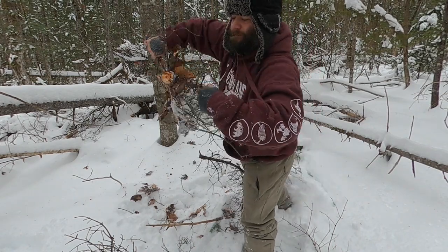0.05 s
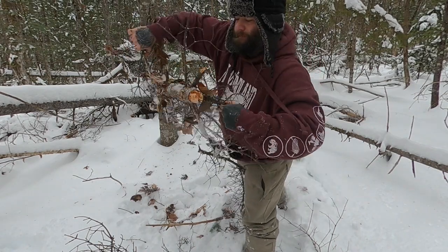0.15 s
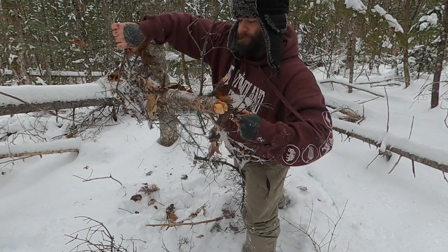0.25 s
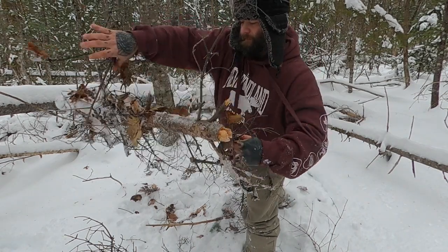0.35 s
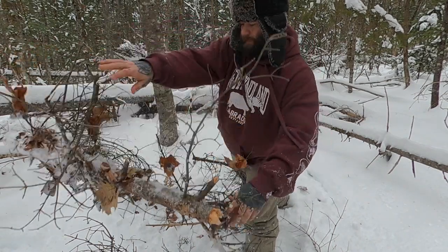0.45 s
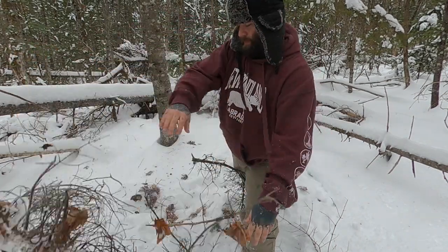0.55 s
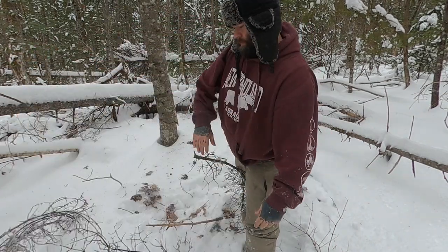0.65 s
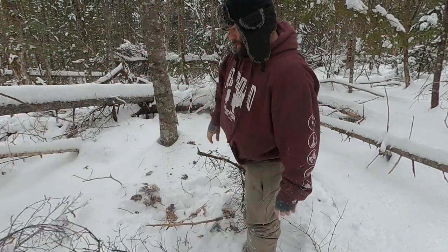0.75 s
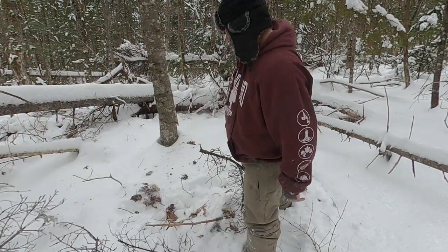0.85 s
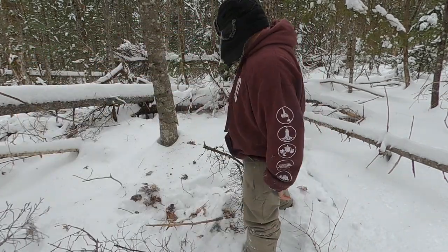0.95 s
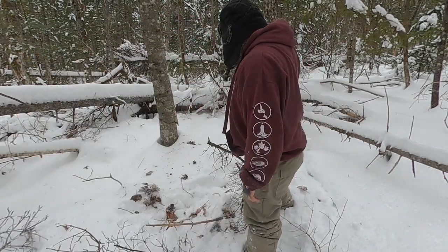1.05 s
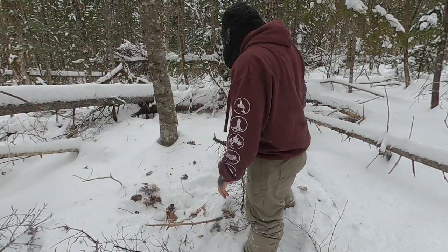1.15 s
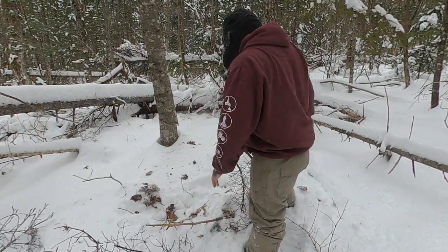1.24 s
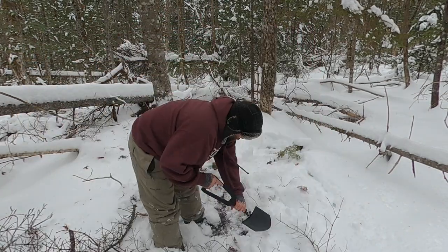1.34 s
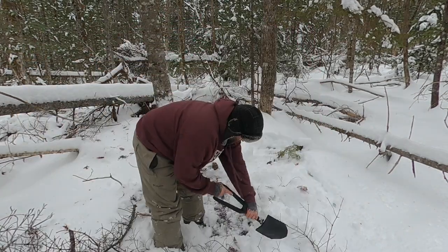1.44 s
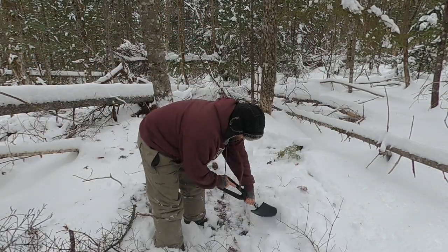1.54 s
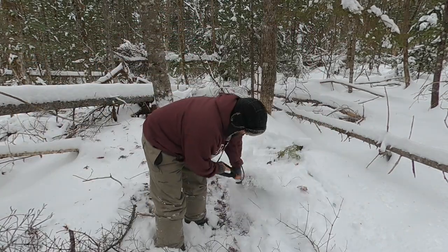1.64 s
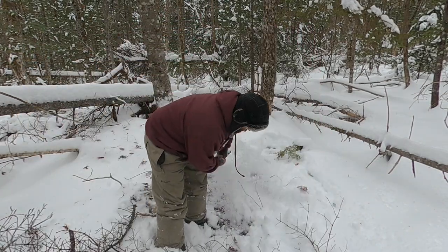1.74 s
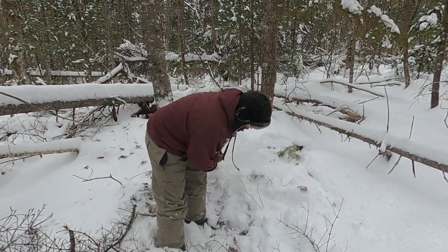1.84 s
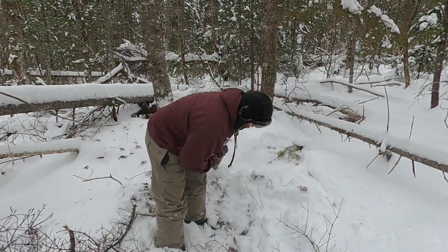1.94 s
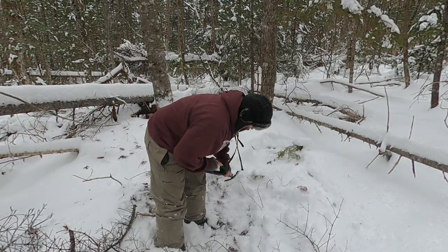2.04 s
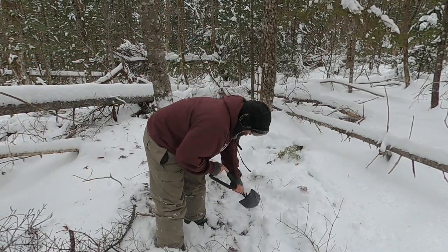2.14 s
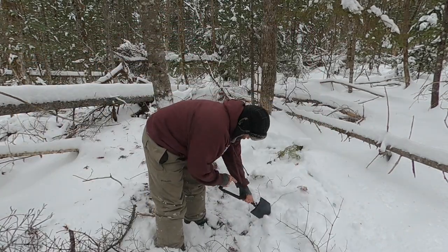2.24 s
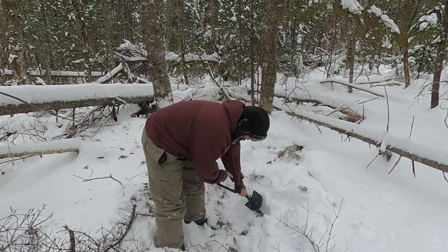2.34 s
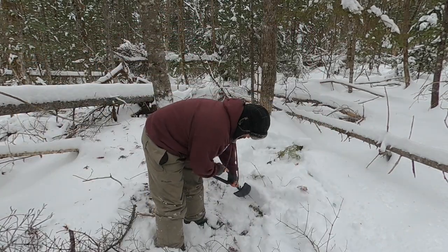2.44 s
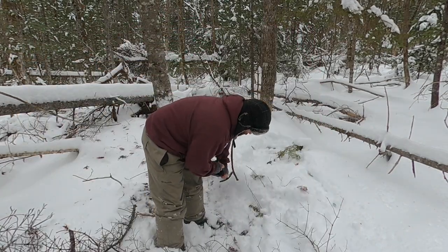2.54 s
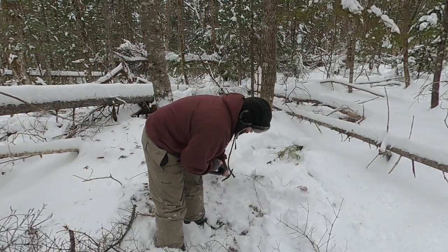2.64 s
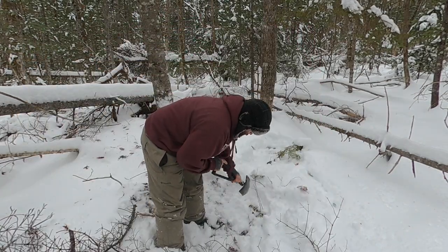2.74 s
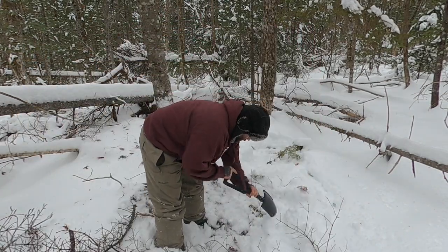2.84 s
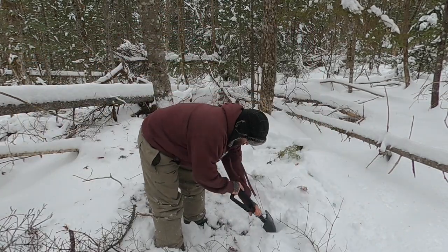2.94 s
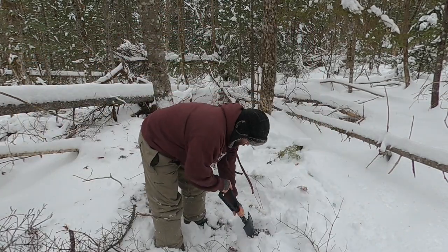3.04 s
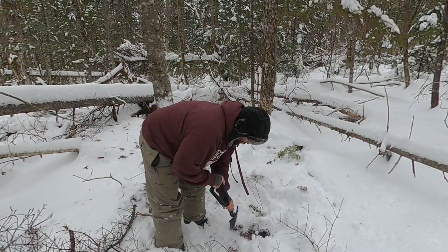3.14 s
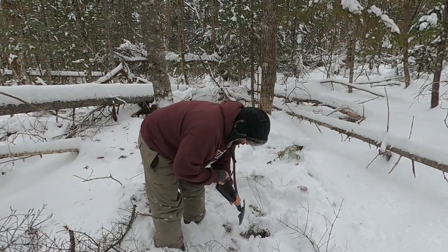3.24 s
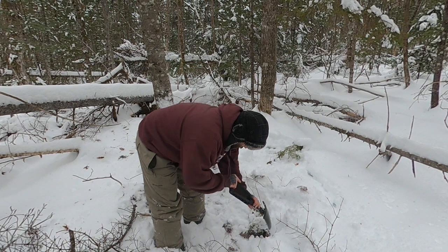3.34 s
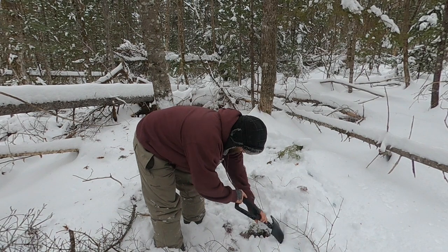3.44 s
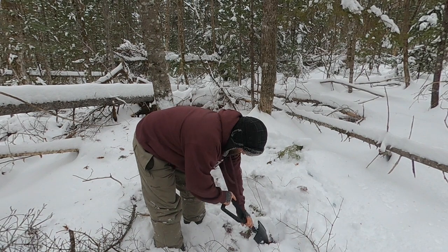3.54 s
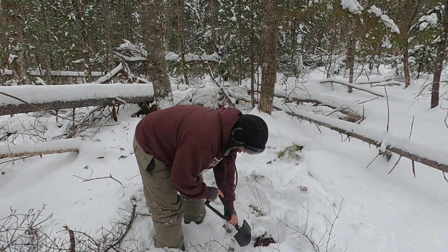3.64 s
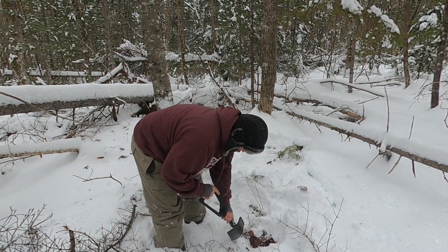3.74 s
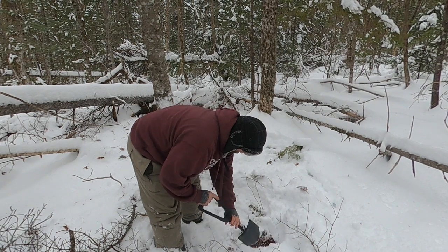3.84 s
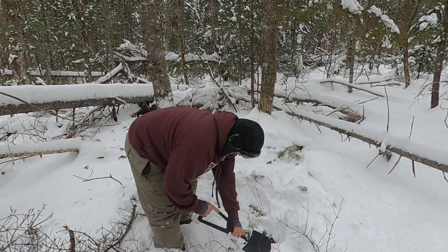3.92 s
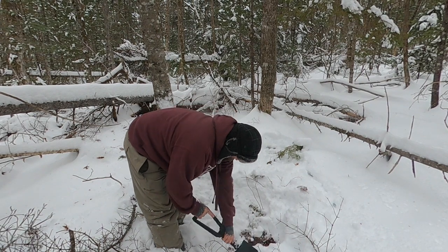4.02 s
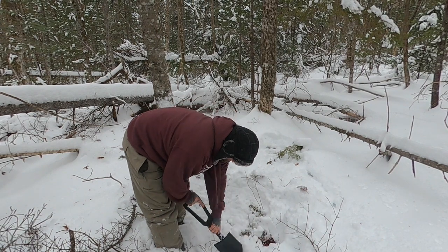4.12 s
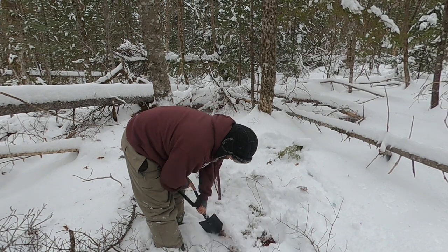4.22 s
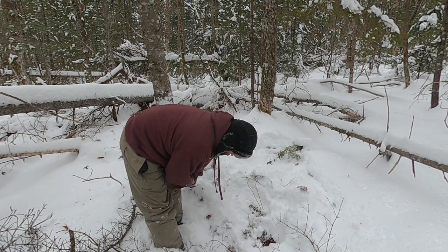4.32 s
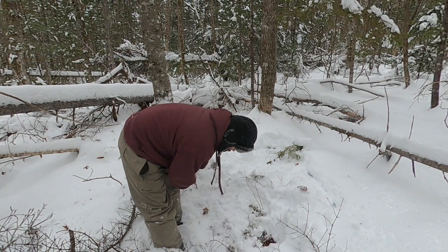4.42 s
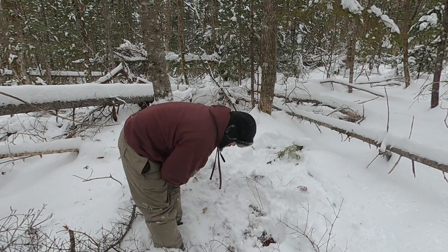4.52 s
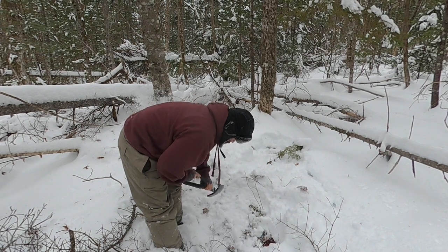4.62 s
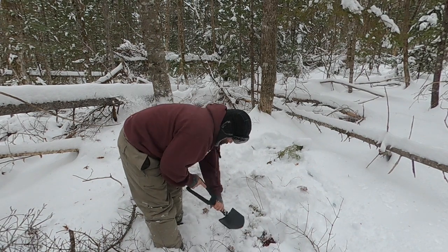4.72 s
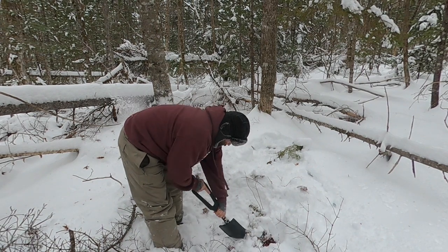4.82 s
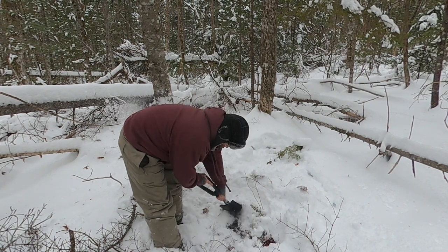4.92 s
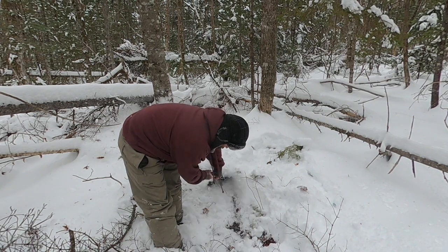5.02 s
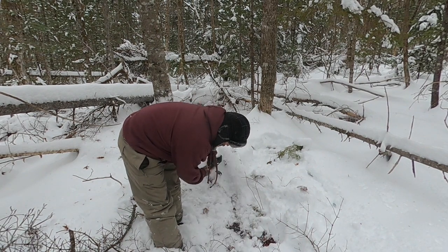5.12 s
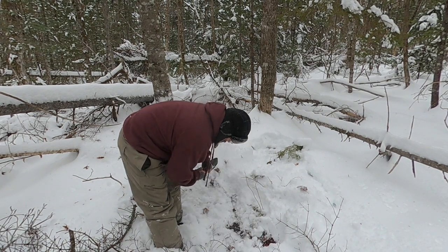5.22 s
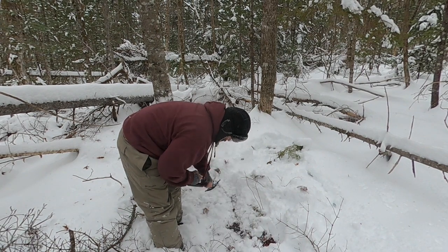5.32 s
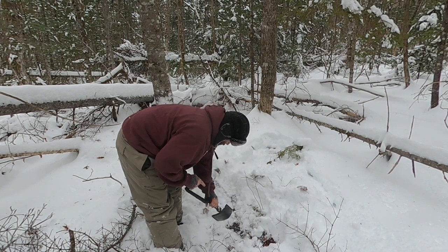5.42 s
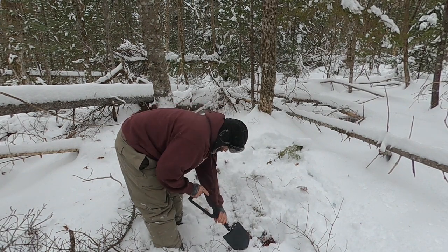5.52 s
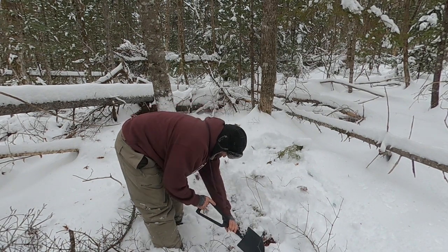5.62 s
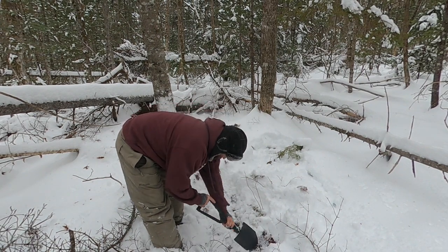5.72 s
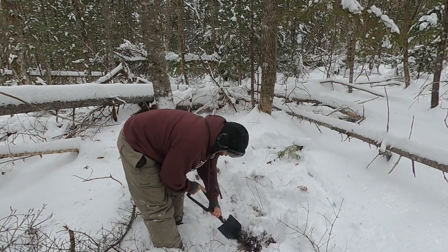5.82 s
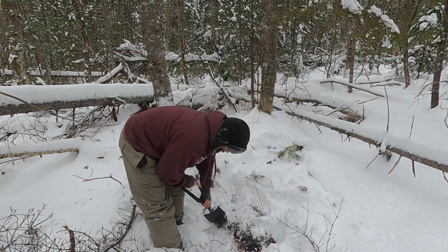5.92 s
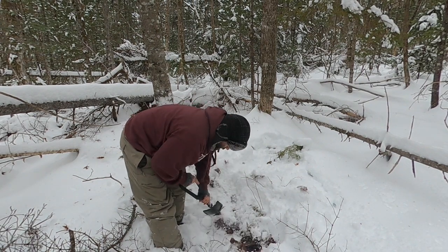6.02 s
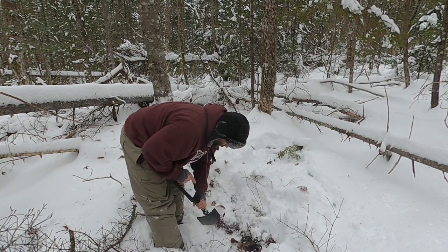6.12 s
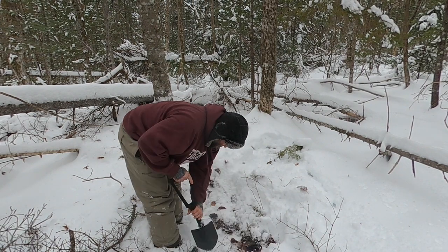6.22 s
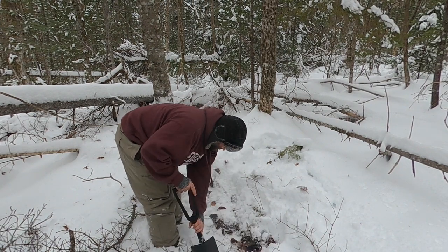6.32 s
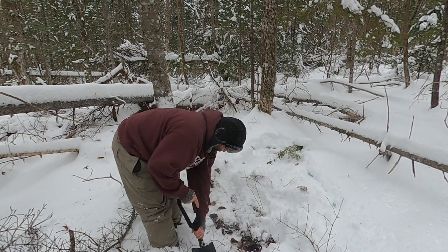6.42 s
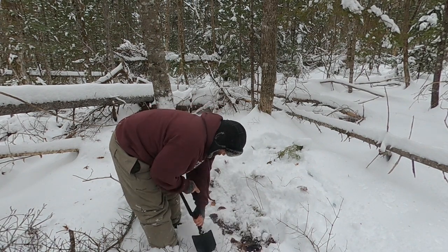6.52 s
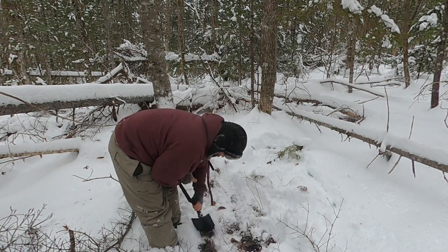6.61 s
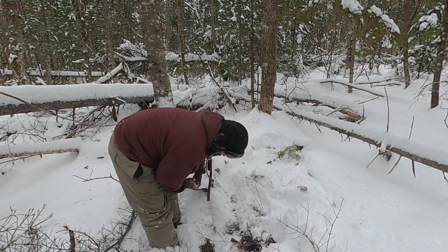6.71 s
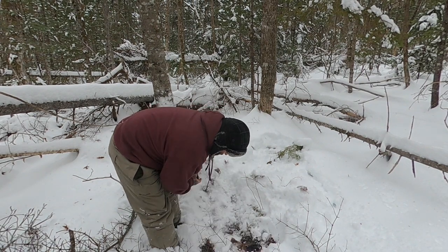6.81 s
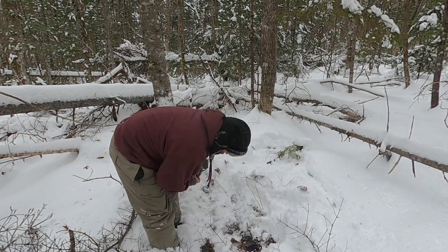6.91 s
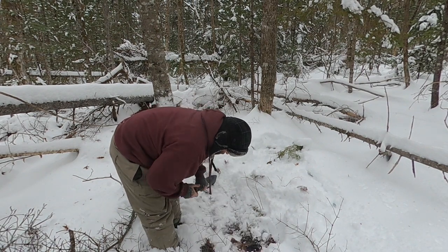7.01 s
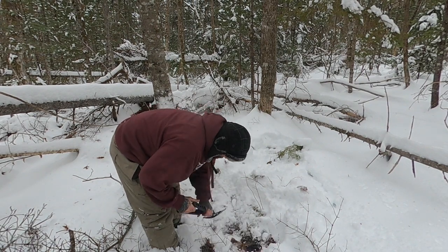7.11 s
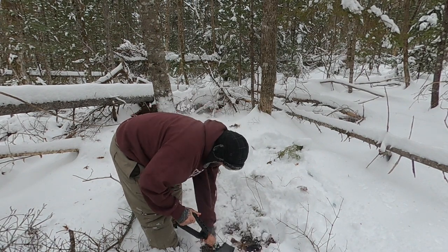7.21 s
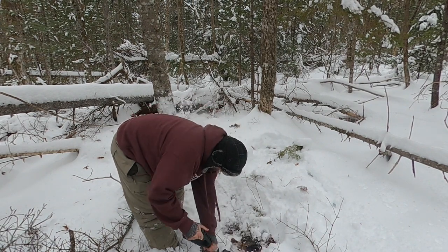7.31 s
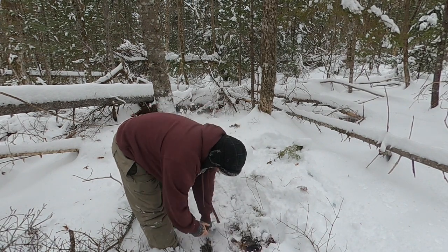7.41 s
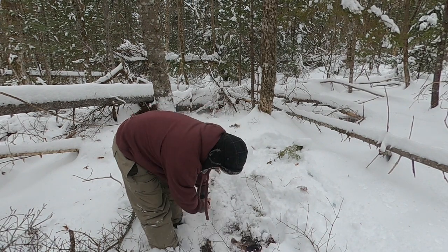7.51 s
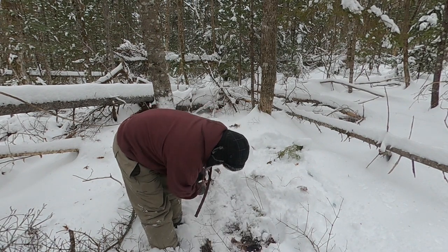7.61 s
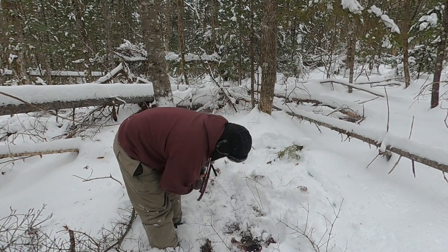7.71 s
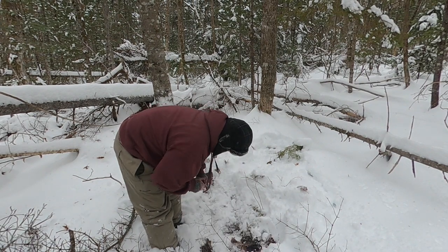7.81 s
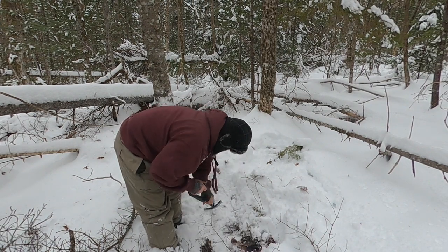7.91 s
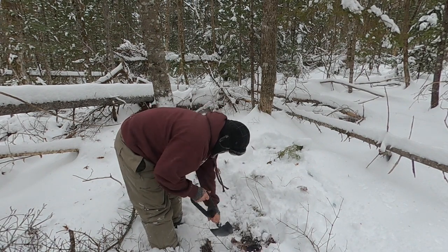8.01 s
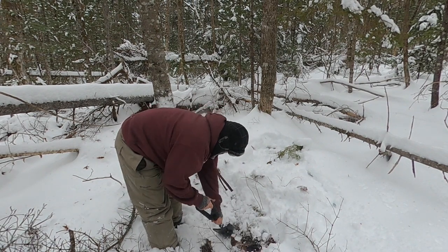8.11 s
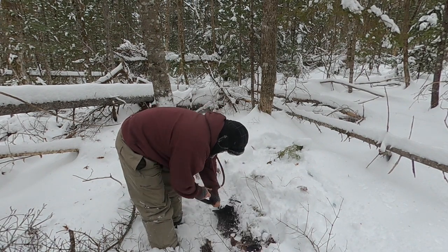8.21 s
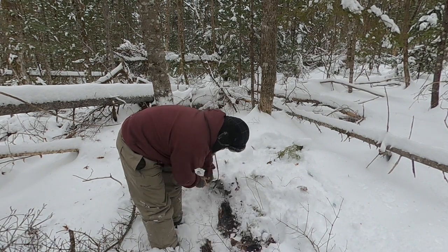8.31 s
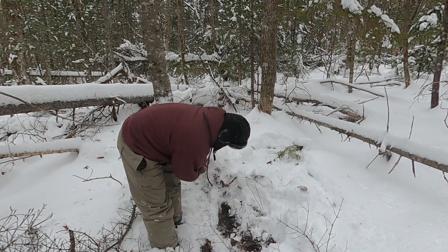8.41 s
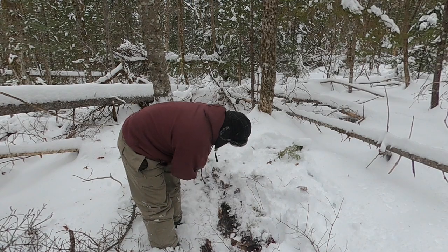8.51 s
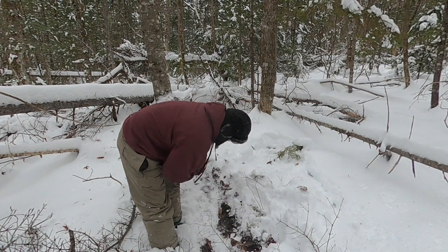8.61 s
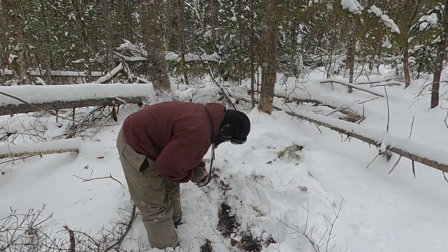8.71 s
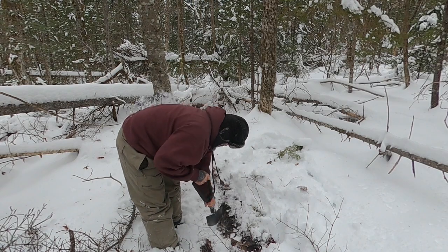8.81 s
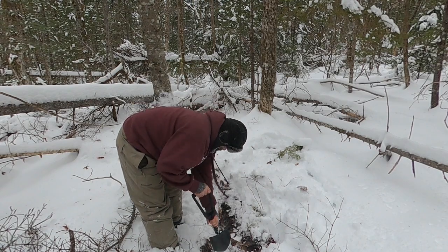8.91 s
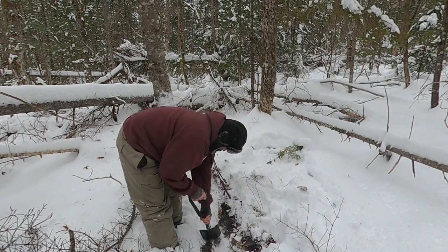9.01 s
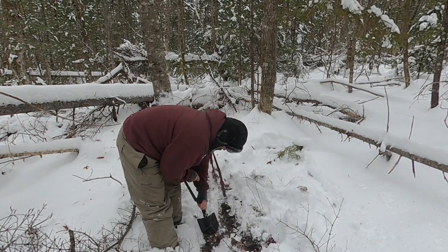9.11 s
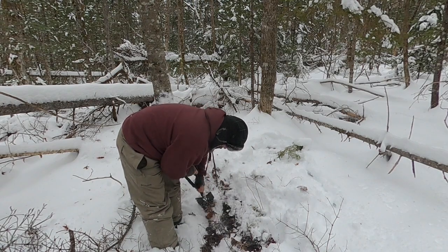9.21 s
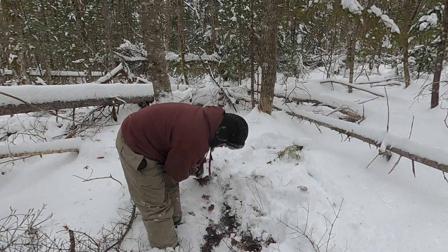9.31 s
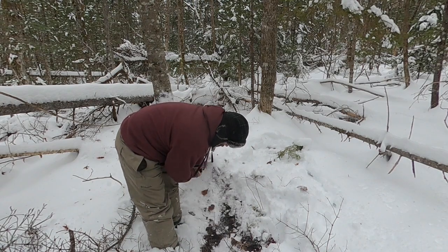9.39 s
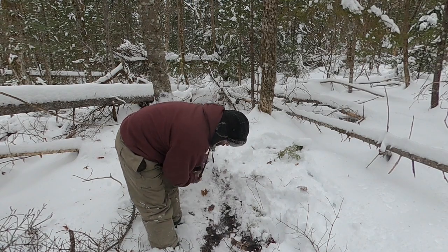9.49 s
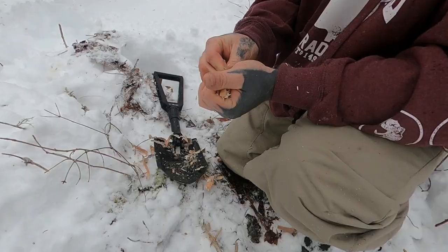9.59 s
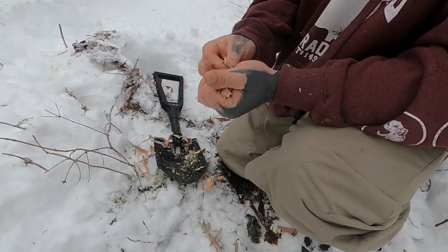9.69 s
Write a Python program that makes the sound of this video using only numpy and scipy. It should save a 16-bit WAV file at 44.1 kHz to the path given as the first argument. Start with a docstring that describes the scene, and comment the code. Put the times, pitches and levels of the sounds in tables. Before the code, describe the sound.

Brushy branches crackle down onto snow, followed by repeated crisp shovel scoops, metallic scrapes and clinks, ending with a faint rub of gloved hands.

```python
"""First a rustle of brush and a low rumble; the bundle lands in the snow with cracks and thuds.
Then a small steel shovel scrapes, taps and scoops crusty snow in a quiet wood; at the end gloved hands rub.
Snow is a crowd of tiny random breaks, the blade a set of fading tones, each snap a short crack of noise and
each thud a few sagging swings. Pressed snow, low rumble (light wind, with swells as lumps land and gloves
move) and still air are filtered noise. A close pair of microphones dulls the treble."""
import sys
import numpy as np
from scipy import signal
from scipy.io import wavfile
from scipy.ndimage import uniform_filter1d

SR = 44100
rng = np.random.default_rng(int(sys.argv[2]) if len(sys.argv) > 2 else 0)


def store_pcm(level_fs):
    """Save levels as 16-bit WAV."""
    pcm = np.round(np.clip(level_fs, -1, 1) * 32767).astype(np.int16)
    wavfile.write(sys.argv[1], SR, np.atleast_2d(pcm).T)


N = 429975

# Shovel strokes through the snow: (start [s], length [s], crunch level [dB], sag [dB per s],
# coarse crust re crunch [dB], snow squeezed ahead of the blade re crunch [dB],
# loose snow trickling after, re the crunch at the end of the stroke [dB]); a negative sag grows louder
SHOVEL_STROKES = [(1.62, 0.11, -49.5, -43, -9, -15, -2), (2.369, 0.2, -44.5, -9, -6.5, -22, -12.5),
                  (3.051, 0.23, -44, 16.5, -7.5, -20, -11), (3.564, 0.17, -43.5, -9, -9, -20, -29),
                  (4.112, 0.24, -42.5, -9, -1, -9.5, -3.5), (4.951, 0.19, -40, 16, -11, -27.5, -12),
                  (5.812, 0.22, -38, 8, -3, -16, -8.5), (6.421, 0.35, -46, -27, -2, -19.5, -21.5),
                  (7.351, 0.21, -52.5, -4.5, -6, -20, -5), (8.231, 0.14, -40, 19, -6, -17, -6),
                  (8.718, .05, -53, 33, -21, -16, -18), (9.07, .015, -48, 3, -14, -17, -25),
                  (9.1, 0.034, -33.5, 1, -1.5, -15.5, -32), (9.283, 0.13, -40, 93, -9, -26, 0.5)]
# The blade or a boot breaks a slab of crust: (time [s], crunch level [dB], coarse crust re crunch [dB])
CRUST_SLABS = [(1.443, -58.5, 4), (1.622, -34.5, -7), (1.737, -34.5, 0.5), (1.908, -56, -3.5),
               (2.105, -59, -24), (2.401, -34.5, -10), (2.513, -34.5, -8.5), (2.668, -57.5, 4),
               (2.844, -54, -7), (3.126, -35, -10.5), (3.508, -55, 4), (3.62, -37, -3.5), (3.805, -41, -9),
               (3.903, -65, 8.5), (4.147, -41.5, -3), (4.326, -30.5, -5), (4.44, -49, -5),
               (4.628, -54, -13), (5.011, -40.5, -3.5), (5.244, -55, -2), (5.681, -52.5, -5),
               (5.83, -35.5, -4), (6.032, -40.5, 0), (6.402, -52, -2), (6.577, -34, 2.5), (6.761, -41, -31),
               (6.888, -40, -7), (7.358, -46, -27), (7.485, -44, 0), (7.559, -51.5, 4.5), (8.076, -57, 1.5),
               (8.13, -44.5, -14), (8.235, -33.5, -2.5), (8.286, -33.5, -0.5), (8.567, -51.5, -7),
               (8.945, -45.5, -14), (9.236, -36.5, 1.5)]
# The bundle of brush rustling, landing and settling, joined by straight lines:
# (time [s], crunch level [dB], coarse re crunch [dB], squeezed snow re crunch [dB])
BRUSH_BUNDLE = [(0.0, -48.5, 0.6, -7.5), (.2, -55, 3.7, 3.5), (0.391, -50.5, -2, -4.5),
                (0.473, -45, -1, -12.5), (0.625, -50.5, 5.5, -9), (0.69, -44.5, 5.5, -14),
                (0.798, -31.5, 6.5, -12), (0.86, -33, -1, -7.5), (1.0, -49, -2.5, -10.5),
                (1.33, -65.5, 4.5, 3.5), (1.377, -79, 4, 8)]
# Colour of fine crystals breaking: (frequency [Hz], level [dB])
FINE_COLOUR = [(800, -44.5), (1800, -8), (3000, -5.5), (4500, -0.06), (7000, 0.8), (15000, -12.5)]
# Colour of coarse crust breaking: (frequency [Hz], level [dB])
COARSE_COLOUR = [(300, -18), (950, -13.5), (1300, -1), (1650, 0.45), (2500, -3.5), (3500, -2), (6000, -10)]
# Blade knocking on crust, stones and roots: (time [s], peak of the ring [dB], favoured low mode [Hz],
# favoured high mode [Hz], damping factor on the ring [-], contact [s], tick re ring [dB])
BLADE_KNOCKS = [(2.195, -47, 1770, 2130, 1.1, 0.00098, -1.5),
                (2.2524, -30.5, 2240, 3060, 1.5, 0.00053, 4.5), (2.2947, -40, 1630, 2870, 1.3, 0.0014, 2),
                (2.9672, -41.5, 1180, 1710, 2.7, 0.0059, 1), (3.5047, -30.5, 1240, 1710, 4.6, .0034, -16),
                (3.8016, -24.5, 1630, 2280, 2.5, 0.0033, 5), (3.8119, -37, 2240, 3070, 2.6, .0018, 11),
                (4.0148, -36, 1210, 1770, 2.2, 0.0042, -6), (4.2873, -21.5, 1700, 3070, 5.5, 0.00045, 10.5),
                (4.7937, -21.5, 2220, 4000, 1.56, 0.00036, 2),
                (4.9228, -37.5, 2600, 3900, 0.89, 0.0083, -10.5), (6.1, -23, 3070, 5800, 2.2, 0.0044, 2.5),
                (6.44, -38, 1665, 3070, 0.59, 0.024, -4), (6.88, -36, 1710, 3070, 1.5, 0.0095, -7.5),
                (7.335, -50, 2160, 3770, 0.48, 0.055, -6), (7.4685, -30.5, 1600, 1660, 2.4, 0.032, -10),
                (8.0646, -41.5, 2120, 3080, 1.6, 0.01, -8), (8.118, -35, 1694, 1630, 0.94, 0.05, -7),
                (8.923, -30.5, 2900, 6400, 1.6, .014, -1), (8.945, -44.5, 726, 3070, 0.79, 0.0027, -3),
                (9.005, -32, 2240, 4130, 3.1, 0.0023, 7.5), (9.055, -45, 1660, 3000, .89, .03, 1.5),
                (9.085, -26, 1670, 4180, 2, 0.042, -13), (9.2286, -7.5, 1710, 7140, 5.5, 0.0027, 2.5),
                (9.2334, -11.5, 3100, 4160, 3.9, 0.0067, -9)]
# Tones of the steel blade before damping: (frequency [Hz], level [dB], time to fade by 60 dB [s])
BLADE_MODES = [(723, -14.5, 0.33), (1222, -23, 0.33), (1712, -14.5, 0.22), (2227, -16, 0.23),
               (2620, -8.5, 0.081), (3071, -12.5, 0.13), (3410, -21, 0.38), (3776, -7, 0.078),
               (4120, -13, 0.12), (4920, -11.5, 0.15), (5400, -37, 0.15), (5620, -4, 0.052),
               (6090, -8.5, 0.04), (6360, -8.5, 0.075), (7220, -2.5, 0.028), (6880, -12, 0.09)]
# Twigs and crust snapping: (time [s], peak [dB], centre [Hz])
TWIG_SNAPS = [(0.373, -29, 6600), (0.482, -27, 3570), (0.5111, -24, 3780), (0.658, -15.5, 1780),
              (0.6967, -13.5, 1600), (0.744, -15.5, 3500), (0.7977, -4.5, 1470), (0.9309, -15.5, 4160),
              (1.0403, -29.5, 3920), (1.257, -38.5, 3460), (1.558, -32, 1320), (1.6116, -22, 4540),
              (1.6991, -18.5, 6400), (1.711, -17, 6230), (1.744, -20.5, 1740), (2.428, -16, 7100),
              (2.547, -21, 4960), (2.5637, -23, 1910), (2.5704, -25.5, 5450), (2.6347, -31, 5180),
              (2.6664, -27.5, 5270), (3.1241, -25, 2670), (3.1624, -21.5, 3700), (3.2577, -23.5, 4000),
              (3.6302, -24.5, 3620), (4.3182, -13.5, 3460), (4.947, -27.5, 1660), (5.0033, -18.5, 3360),
              (5.22, -35, 5680), (5.682, -41.5, 4500), (7.273, -48.5, 2460), (5.239, -26, 5200),
              (5.8505, -21.5, 2110), (5.881, -15, 2570), (5.9197, -20, 2340), (5.9356, -4, 5070),
              (6.0366, -20.5, 3900), (6.599, -15, 2850), (7.4932, -18.5, 1950), (8.2806, -12.5, 5420),
              (8.3137, -22, 3700), (9.616, -31, 1530)]
# Lumps landing and boots settling: (time [s], starting level [dB], settled pitch [Hz],
# ground swing re thud [dB])
SNOW_THUDS = [(0.802, -18.5, 222, 0.5), (0.823, -17.5, 97, -17), (.878, -28, 95, 0.5),
              (1.442, -41.5, 150, -10.5), (1.502, -37.5, 222, -32), (1.556, -31, 188, -24),
              (2.422, -39.5, 193, -15), (3.107, -39.5, 150, -26), (3.607, -40, 184, -14),
              (3.843, -29.5, 165, -12), (3.909, -24, 226, -10.5), (4.1, -39, 151, -18),
              (4.395, -39, 148, -14), (4.43, -35, 216, -26), (4.623, -36.5, 196, -18.5),
              (4.989, -47.5, 156, -35), (6.433, -31, 294, -24), (6.463, -24, 243, -16),
              (6.48, -23.5, 256, -14.5), (6.52, -31, 216, -17), (6.533, -30.5, 274, -10),
              (6.55, -30.5, 256, -14), (6.953, -31.5, 164.5, -12), (8.281, -23.5, 261, -50),
              (8.306, -29.5, 233, -50), (9.228, -48, 173, -39)]
# Frozen ground and stand swinging after a thud: (frequency [Hz], level [dB], time to fade by 60 dB [s])
GROUND_MODES = [(56.6, -0.5, 0.21), (96.8, 8, 0.17)]
# Colour of snow being squeezed: (frequency [Hz], level [dB])
SQUEEZE_COLOUR = [(60, -39.5), (130, -1.5), (240, 2), (400, -6), (700, -9), (1500, -22)]
# Low rumble below 120 Hz: light wind, with swells as lumps land and gloves move,
# joined by straight lines: (time [s], level [dB])
RUMBLE_LEVEL = [(0, -43), (.38, -51.5), (.7, -59), (.84, -34), (1.08, -54.5), (1.54, -59), (2.2, -82),
                (2.4, -56), (2.55, -71), (3.1, -63), (3.69, -85), (3.94, -48), (4.05, -61), (5.2, -69),
                (5.35, -60), (5.8, -68.5), (6.1, -78), (6.85, -85), (7.0, -57), (7.15, -79), (9.59, -79),
                (9.625, -43), (9.75, -49)]
# Colour of the low rumble: (frequency [Hz], level [dB])
RUMBLE_COLOUR = [(12, -9), (35, -5), (70, -15.5), (120, -31), (300, -57)]
# Colour of still air, before the microphone colour: (frequency [Hz], level [dB])
AIR_COLOUR = [(30, -6), (100, -33.5), (160, 7.5), (300, 2), (600, -8), (1000, -13.5), (1600, -1.5),
              (2500, -17.5), (4000, -10), (6500, -12.5), (15000, -5)]
# Treble lost in both microphones: (frequency [Hz], level [dB])
MICROPHONE_COLOUR = [(6900, 0.02), (7600, -6.5), (8500, -18.5), (9800, -26), (12500, -26.5), (15000, -39)]
# Colour given to the left-right difference: (frequency [Hz], level [dB])
DIFFERENCE_COLOUR = [(30, -5), (100, 4), (400, -2), (1100, 4.5), (2500, 7.5), (6000, 3), (9000, 7.5),
                     (14000, 13.5)]

ENTER_DB_PER_S, LEAVE_DB_PER_S = 472, 330.  # the blade digs in fast and leaves more slowly
TRICKLE_DB_PER_S, TRICKLE_COARSE_DB = 74, -8.5  # loose snow slides on; coarse part re trickle
LOAD_DB_PER_S, BREAK_DB_PER_S = 609, 409  # a slab's crunch rises, then falls
PACK_RE_SLAB_DB = -8.5  # snow squeezed under a slab, re its coarse crust
GLOVES_S, GLOVES_DB = 9.613, -54.
GLOVES_COARSE_DB, GLOVES_PACK_DB = -6., -2.5  # re the glove level
PACK_RE_THUD_DB = -23.5  # snow squeezed under each thud
PRESS_DB_PER_S, EASE_DB_PER_S = 188, 300  # it swells into each thud and lets go after it
SNAP_T60_S = 0.041  # the weak tail of a snap fades by 60 dB
THUD_TURNS = 9.4  # swings until a thud has lost 60 dB
AIR_DB = -60.5
EDGE_HZ = 15600  # upper limit of the sound
STEP = 32  # slow gains are worked out once in this many samples


def crunch():
    """Fine and coarse breaks under each movement; while the shovel works they also shake the blade."""
    fine_gain, coarse_gain, _ = movement()
    fine = grains(per_s=800., spread_db=2.6, smooth=1.0, likeness=0.98)
    coarse = grains(per_s=500., spread_db=0.7, smooth=1.4, likeness=1.0)
    out = fine_gain * patchy(colour(fine, FINE_COLOUR), db=3.0)
    out = out + coarse_gain * patchy(colour(coarse, COARSE_COLOUR), db=3.0)
    out = out * flutter(per_s=67.0, db=1.53)
    # (time [s], how much the crunch shakes the blade [0 to 1])
    shovel, = curve([(1.5, 0), (1.6, 1), (9.5, 1), (9.6, 0)])
    steel = blade([], 0, damping=1.5)
    steel = steel / np.linalg.norm(steel)
    ringing = signal.oaconvolve(out.mean(0) * shovel, steel)[:N]
    return out + amp(-14.0) * ringing


def movement():
    """Gains of fine crunch, coarse crunch and squeezed snow; all movements add in power."""
    parts = []  # (gain, coarse re gain [dB], squeezed snow re gain [dB])
    for s, length, db, sag, coarse_db, pack_db, loose_db in SHOVEL_STROKES:
        stroke = swell(s, length, db, ENTER_DB_PER_S, LEAVE_DB_PER_S, sag)
        parts.append((stroke, coarse_db, pack_db))
        end_db = db - sag * length
        trickle = swell(s + length, 0, end_db + loose_db, ENTER_DB_PER_S, TRICKLE_DB_PER_S)
        parts.append((trickle, TRICKLE_COARSE_DB, -np.inf))
    for s, db, coarse_db in CRUST_SLABS:
        slab = swell(s, 0, db, LOAD_DB_PER_S, BREAK_DB_PER_S)
        parts.append((slab, coarse_db, coarse_db + PACK_RE_SLAB_DB))
    gloves = swell(GLOVES_S, 1, GLOVES_DB, 3000, 0)
    parts.append((gloves, GLOVES_COARSE_DB, GLOVES_PACK_DB))

    brush_db, brush_coarse_db, brush_pack_db = curve(BRUSH_BUNDLE)
    # doubling the dB turns a gain into power
    fine = full(sum(g ** 2 for g, *_ in parts)) + amp(2 * brush_db)
    coarse = full(sum((g * amp(db)) ** 2 for g, db, _ in parts)) + amp(2 * (brush_db + brush_coarse_db))
    pack = full(sum((g * amp(db)) ** 2 for g, _, db in parts)) + amp(2 * (brush_db + brush_pack_db))
    return np.sqrt([fine, coarse, pack])


def patchy(x, db):
    """Every handful of snow has its own colour: random short patches over time and pitch."""
    z = signal.stft(x, nperseg=256)[2]
    patches = rng.standard_normal(z.shape[1:])
    patches = uniform_filter1d(patches, 3, axis=0)  # neighbouring pitches
    patches = uniform_filter1d(patches, 5, axis=1)  # neighbouring moments
    coloured = signal.istft(z * amp(db * evened(patches)), nperseg=256)[1]
    return evened(coloured[:, :N])


def knocks():
    """A gritty contact, short for a tap and long for a slide, sets the blade ringing."""
    out, t = np.zeros((2, N)), np.arange(6000) / SR
    # the knocks carry little bass
    no_bass = signal.butter(2, 1100, "highpass", fs=SR, output="sos")
    for s, db, low_hz, high_hz, damping, contact, tick_db in BLADE_KNOCKS:
        grit = rng.standard_normal(len(t)) * np.exp(-(t / max(contact, .0003)) ** 2)
        grit[0] += 2.5  # the first touch
        ring = blade([low_hz, high_hz], lift_db=13.5, damping=max(damping, .3))
        sound = signal.sosfilt(no_bass, signal.oaconvolve(grit, ring))
        tick = crack(t, 0.0012, 3 * contact + 0.056, slow_share=0.11)
        sound /= abs(sound).max()
        sound[:len(t)] += amp(tick_db) * tick / abs(tick).max()
        add(out, s, amp(db) * sound[None])
    return out


def blade(favoured_hz, lift_db, damping):
    """Ring of the steel after one impulse; the place of the blow favours some modes."""
    t = np.arange(8000) / SR
    hz, db, t60 = np.transpose(BLADE_MODES)[:, :, None]
    reach = .07  # octaves
    near = sum(np.exp(-(np.log2(hz / f) / reach) ** 2) for f in favoured_hz)
    # snow on the blade mutes low modes
    buried_db = 3.5 * max(damping - 1, 0) * np.minimum(np.log2(hz / 1600), 0)
    level_db = db + lift_db * near + buried_db - 60 * damping * t / t60
    return (amp(level_db) * np.sin(2 * np.pi * hz * t)).sum(0)


def snaps():
    """Twigs and crust give a sharp crack with a weak tail, gathered round the centre pitch."""
    out, t = np.zeros((2, N)), np.arange(2500) / SR
    for s, db, hz in TWIG_SNAPS:
        noise = crack(t, 0.00078, SNAP_T60_S, slow_share=0.16)
        pitched = signal.lfilter(*signal.iirpeak(hz, 1.6, SR), noise)
        sound = pitched + 0.38 * noise
        add(out, s, amp(db) * sound[None] / abs(sound).max())
    return out


def crack(t, fast_t60, slow_t60, slow_share):
    """Noise with a sharp front and a weaker, longer tail, without bass or the highest treble."""
    fade = amp(-60 * t / fast_t60) + slow_share * amp(-60 * t / slow_t60)
    noise = rng.standard_normal(len(t)) * fade
    return signal.sosfilt(signal.butter(2, [1100, 7500], "bandpass", fs=SR, output="sos"), noise)


def thuds():
    """A few damped swings whose pitch sags as the snow gives way; the ground swings on."""
    out, t = np.zeros((2, N)), np.arange(14000) / SR
    ground = sum(amp(db - 60 * t / t60) * np.sin(2 * np.pi * hz * t) for hz, db, t60 in GROUND_MODES)
    ground = ground * (1 - np.exp(-t / 0.022))  # it starts gently
    for s, db, hz, ground_db in SNOW_THUDS:
        # the pitch starts a third higher and settles
        turns = hz * (t + 0.0022 * (1 - np.exp(-t / 0.0067)))
        swing = amp(-60 * t * hz / THUD_TURNS) * np.sin(2 * np.pi * turns)
        swing = swing * (1 - np.exp(-t / 0.0006))
        add(out, s, amp(db) * (swing + amp(ground_db) * ground)[None])
    return out


def packing():
    """Dull lumpy creak of snow being pressed together, under thuds and other movements."""
    lumps = grains(per_s=400., spread_db=6.0, smooth=0.9, likeness=0.99)
    thud_power = sum(swell(s, 0, db + PACK_RE_THUD_DB, PRESS_DB_PER_S, EASE_DB_PER_S) ** 2
                     for s, db, *_ in SNOW_THUDS)
    gain = np.sqrt(full(thud_power) + movement()[2] ** 2)
    return gain * evened(colour(lumps, SQUEEZE_COLOUR))


def trees(x):
    """Weak short scatter from snow and trunks, different at each microphone."""
    t = np.arange(6000) / SR
    taps = rng.standard_normal((2, len(t))) * amp(-60 * t / 0.073) * (t > .002)
    return signal.oaconvolve(x, taps / np.linalg.norm(taps[0]), axes=1)[:, :N]


def low_rumble():
    """Lumpy low noise, partly shared left and right: light wind, swelling as lumps land and gloves move."""
    lumps = grains(per_s=41.0, spread_db=2.0, smooth=5.4, likeness=.55) * flutter(per_s=9.1, db=4.5)
    return amp(curve(RUMBLE_LEVEL)[0]) * evened(colour(lumps, RUMBLE_COLOUR))


def air():
    """Faint hush of the wood, nearly steady: filtered noise with a slight waver."""
    hush = grains(per_s=280.0, spread_db=10.0, smooth=7., likeness=0.85) * flutter(per_s=19.0, db=-1.44)
    return amp(AIR_DB) * evened(colour(hush, AIR_COLOUR))


def grains(per_s, spread_db, smooth, likeness):
    """Random breaks of very unequal size over a smooth hiss, partly unlike left and right."""
    happens = rng.random(N) < per_s / SR
    size = amp(spread_db * np.minimum(rng.exponential(1, N), 4.2)) * happens
    burst = signal.lfilter([1], [1, -.95], size)  # each break is about a millisecond of noise
    mid, side = rng.standard_normal((2, N)) * (smooth + evened(burst))
    unlike = np.sqrt(1 - np.clip(likeness, 0, 1))
    return evened(np.array([mid + unlike * side, mid - unlike * side]))


def flutter(per_s, db):
    """Gain that wavers at random: smoothed noise used as a level in dB."""
    size = int(SR / per_s)
    waver = uniform_filter1d(uniform_filter1d(rng.standard_normal(N), size), size)
    return amp(db * evened(waver))


def swell(start, length, db, rise, fall, sag=0):
    """Gain that climbs to db at rise dB a second, sags for its length, then falls at fall dB a second."""
    t = np.arange(0, N, STEP) / SR - start
    before_db = rise * np.maximum(-t, 0)
    during_db = sag * np.clip(t, 0, length)
    after_db = fall * np.maximum(t - length, 0)
    return amp(db - before_db - during_db - after_db)


def full(x):
    """Stretch a slow gain to one value per sample."""
    return np.repeat(x, STEP)[:N]


def curve(rows):
    """Columns of a time table at every sample."""
    s, *columns = np.transpose(rows)
    return [np.interp(np.arange(N) / SR, s, c) for c in columns]


def colour(x, points, size=8192):
    """Filter with the given spectrum that acts only after each sound, so clicks keep a sharp front."""
    f, db = np.transpose(points)
    hz = abs(np.fft.fftfreq(size, 1 / SR))
    log_gain = np.interp(np.log(hz + 1), np.log(f), db) * np.log(10) / 20
    # the Hilbert transform finds the timing that puts the energy first
    taps = np.fft.ifft(np.exp(np.conj(signal.hilbert(log_gain)))).real[:size // 2]
    return signal.oaconvolve(np.atleast_2d(x), taps[None], axes=1)[:, :N]


def add(mix, s, sound):
    """Lay a sound into the mix at s seconds, cut off at the end."""
    part = mix[:, round(s * SR):][:, :sound.shape[1]]
    part += sound[:, :part.shape[1]]


def amp(db):
    """Turn dB into a plain multiplier."""
    return 10 ** (np.asarray(db) / 20)


def evened(x):
    """Scale to an average strength (RMS) of 1."""
    return x / np.sqrt(np.mean(x ** 2) + 1e-20)


def scene():
    """Nearby sounds with their faint scatter, over pressed snow, low rumble and still air."""
    near = crunch() + knocks() + snaps() + thuds()
    return near + amp(-22.5) * trees(near) + packing() + low_rumble() + air()


def record(dry):
    """Two microphones: recolour the left-right difference, dull the treble steeply, then limit the band."""
    mid = dry.mean(0)
    side = colour((dry[0] - dry[1]) / 2, DIFFERENCE_COLOUR)[0]
    heard = colour(np.array([mid + side, mid - side]), MICROPHONE_COLOUR)
    band_limit = signal.firwin(511, EDGE_HZ, window=("kaiser", 9), fs=SR)
    return signal.oaconvolve(heard, band_limit[None], "same")


dry = scene()
out = record(dry)
store_pcm(out)
```